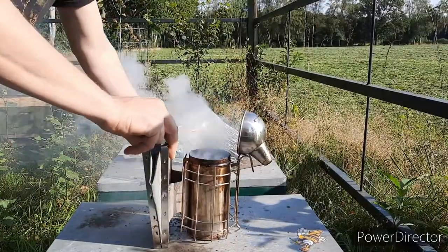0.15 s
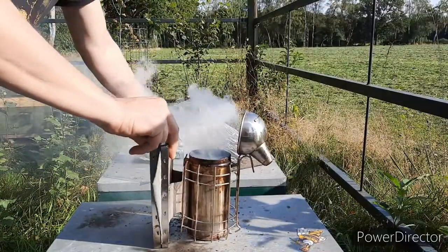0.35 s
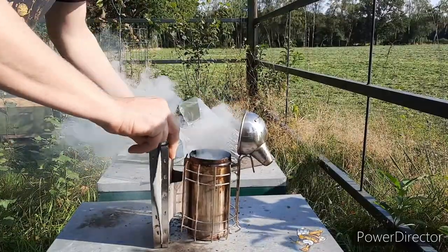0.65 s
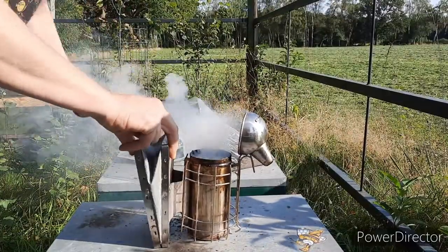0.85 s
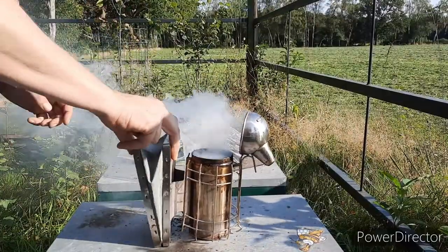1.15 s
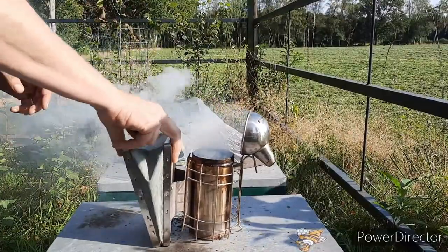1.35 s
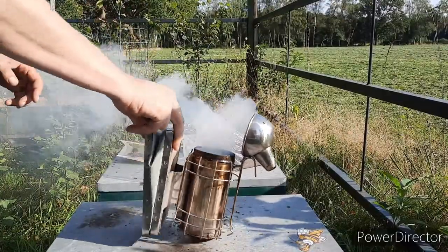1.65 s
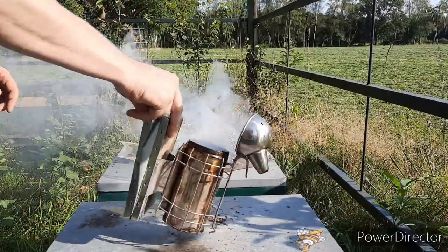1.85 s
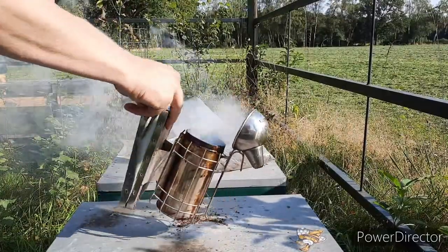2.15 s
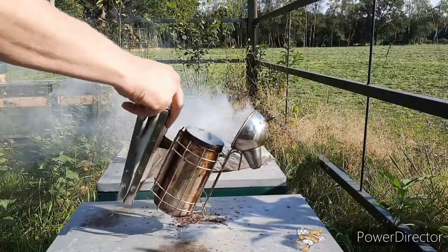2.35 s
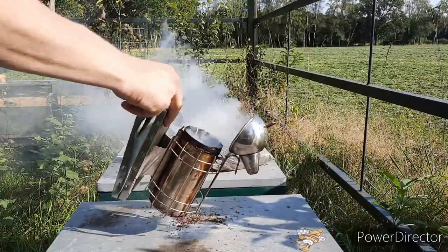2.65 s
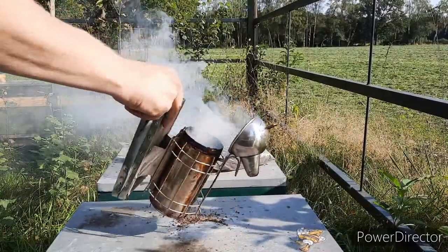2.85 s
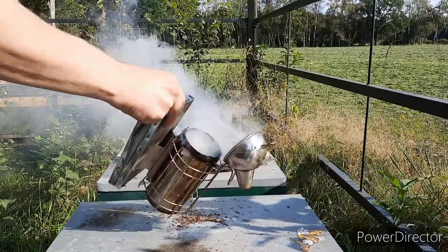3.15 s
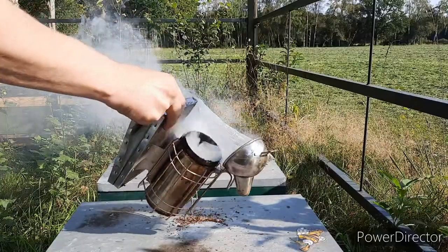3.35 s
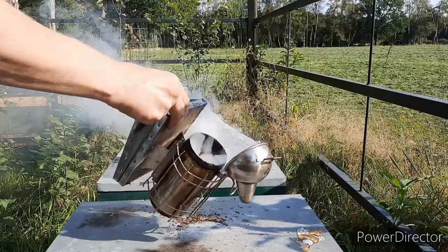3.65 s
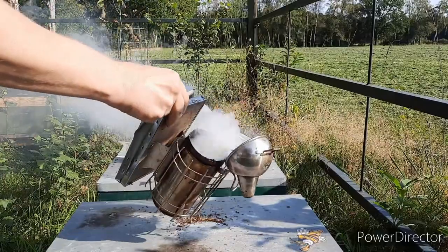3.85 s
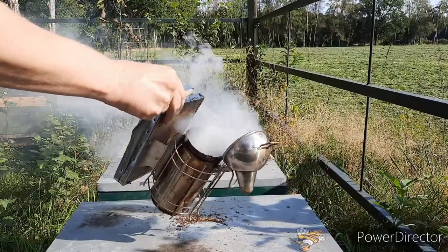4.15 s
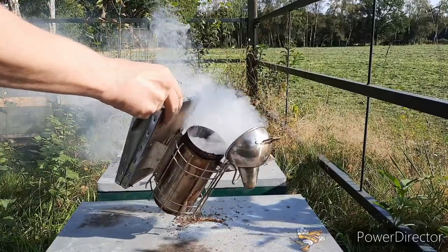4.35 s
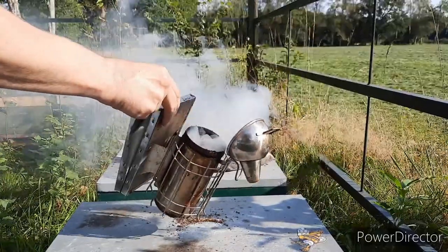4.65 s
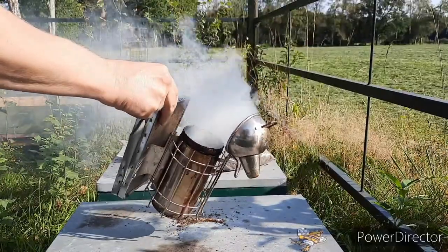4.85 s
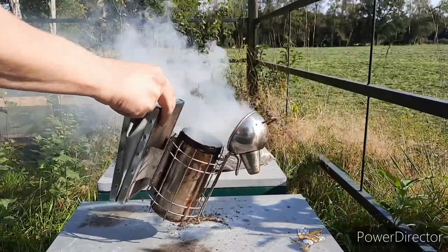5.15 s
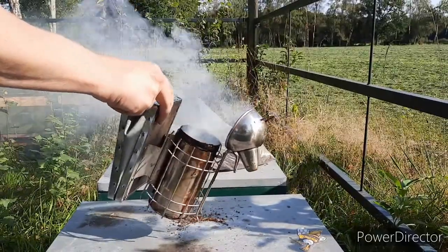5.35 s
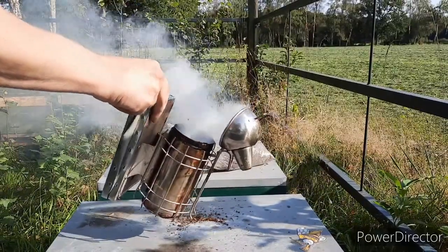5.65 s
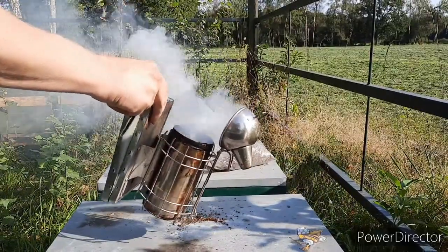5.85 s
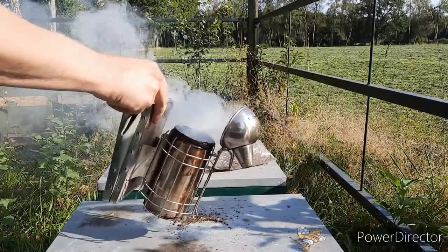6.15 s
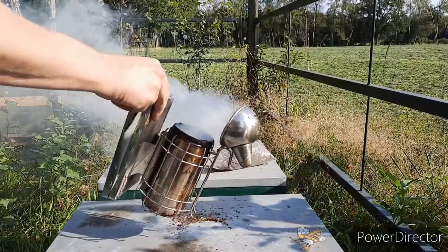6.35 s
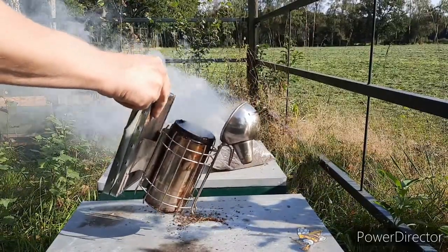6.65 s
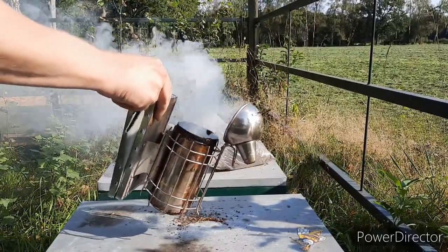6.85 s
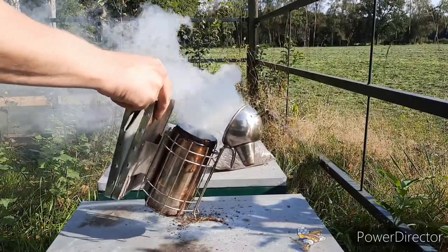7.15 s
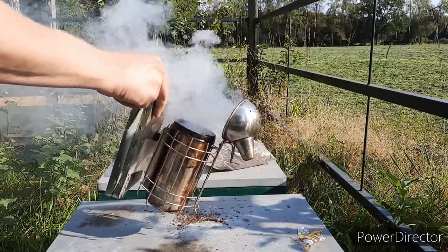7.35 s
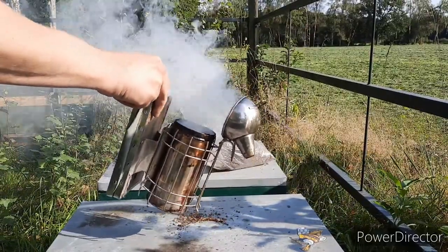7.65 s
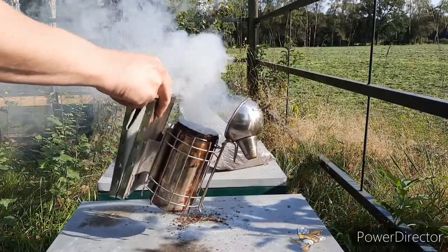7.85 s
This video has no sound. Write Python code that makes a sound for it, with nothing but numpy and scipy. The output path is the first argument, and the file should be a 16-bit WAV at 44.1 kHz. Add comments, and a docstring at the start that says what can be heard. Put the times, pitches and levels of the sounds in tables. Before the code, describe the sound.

Close puffs of air roar through a smouldering tin can, with leather rustle, ticks and knocks, low wind buffeting and later distant rooster calls.

```python
"""Hand bellows pump air into a tin can of smouldering fuel in a meadow, heard close by a two-port microphone.
From the start strokes roar in the can, hiss and whistle at the air hole, over a far hush and buffeting wind.
Between strokes leather rustles and the inlet wheezes; tin and boards tick and knock until about 6 s.
A second hand scrapes over the bellows in the first 1.3 s. From 3.7 s two roosters call far away; the
longest pause between strokes falls near 5 s. Sources are shaped noise, swept tones and ringing modes."""
import sys
import numpy as np
from scipy import signal
from scipy.fft import rfft, irfft, next_fast_len
from scipy.io import wavfile
from scipy.ndimage import uniform_filter1d, map_coordinates

SR = 44100
rng = np.random.default_rng(int(sys.argv[2]) if len(sys.argv) > 2 else 0)


def wav_record(signal):
    """Record a signal, one row per channel, as 16-bit PCM in the file named by sys.argv[1]."""
    frames = np.transpose(np.atleast_2d(signal))
    bounded = np.clip(frames, -1, 1)
    # unit amplitude maps onto the largest positive 16-bit level
    quanta = np.round(bounded * 32767).astype(np.int16)
    wavfile.write(sys.argv[1], SR, quanta)


N = 352800  # 8 s

# bellows strokes: (start [s], fastest [s], end [s], roar level [dB], top of the whistle [Hz],
# whistle level [dB], rustle level of the refill [dB])
BELLOWS_STROKES = [(-0.052, -0.01, 0.042, -25.3, 8300, -60, -54),
                   (0.233, 0.299, 0.372, -22.8, 8860, -56, -53), (0.562, 0.615, 0.7, -33.2, 7300, -70, -59),
                   (0.986, 1.036, 1.13, -27.4, 8020, -61, -55),
                   (1.462, 1.568, 1.709, -24.9, 8680, -55, -60),
                   (1.847, 1.913, 1.999, -27.6, 8320, -57, -59),
                   (2.173, 2.231, 2.339, -30.6, 8860, -57, -62),
                   (2.507, 2.565, 2.649, -28.5, 9280, -58, -59),
                   (2.833, 2.887, 2.96, -26.5, 9580, -58, -55),
                   (3.141, 3.187, 3.302, -29.5, 8800, -57, -59),
                   (3.462, 3.52, 3.598, -33.9, 7360, -68, -57),
                   (3.759, 3.821, 3.922, -30.5, 8500, -56, -56),
                   (4.099, 4.161, 4.246, -29.4, 8680, -54, -56),
                   (4.441, 4.495, 4.602, -30.9, 8200, -67, -57),
                   (4.772, 4.83, 4.893, -28.5, 10200, -63, -63),
                   (5.478, 5.564, 5.711, -30.3, 7900, -56, -59),
                   (5.895, 5.949, 6.054, -28.6, 8860, -58, -56), (6.246, 6.3, 6.376, -29.8, 8140, -62, -55),
                   (6.56, 6.63, 6.708, -28.9, 8980, -57, -59), (6.907, 6.961, 7.057, -28.9, 9460, -59, -59),
                   (7.258, 7.312, 7.388, -29.5, 8980, -58, -54),
                   (7.579, 7.653, 7.734, -30.0, 8320, -54, -58),
                   (7.924, 7.982, 8.07, -29.5, 8560, -53, -65)]
# modes of the air in the can: (centre [Hz], width [Hz], level [dB])
CAN_MODES = [(383, 234, -8.5), (564.2, 76.8, 4), (697, 350, -10), (1198, 168, -9.5), (1386, 260, -15.5),
             (2190, 400, -22)]
# modes of the tin wall: (centre [Hz], width [Hz], level [dB])
TIN_MODES = [(1400, 1870, 8), (5800, 1840, 4.5), (12500, 1500, 0)]
LEAD_S = .00012  # a near source reaches the left port this much earlier


def amp(db):
    """Gain of a level in dB."""
    return 10 ** (np.asarray(db) / 20)


def unit(x):
    """x at rms 1."""
    return x / np.sqrt(np.mean(x ** 2) + 1e-20)


def along(points, hz):
    """Value at hz of (frequency, value) points, on a log frequency axis."""
    f, v = np.transpose(points)
    return np.interp(np.log(hz + 1), np.log(f + 1), v)


def wobble(rate):
    """A smooth random curve, rate knots a second."""
    knots = rng.standard_normal(int(N * rate / SR) + 4)
    return map_coordinates(knots, [np.arange(N) * rate / SR])


def filtered(x, response):
    """x times a complex response of frequency."""
    m = next_fast_len(N + SR // 2)
    return irfft(rfft(x, m) * response(np.fft.rfftfreq(m, 1 / SR)), m)[..., :N]


def resonances(modes):
    """Causal response of (centre, width, level) modes, summed with alternating sign."""
    def response(f):
        return sum((-1) ** k * amp(db) * 1j * f * width / (centre * centre - f * f + 1j * f * width)
                   for k, (centre, width, db) in enumerate(modes))
    return response


def noise(spectrum, channels=1):
    """Coloured noise of rms 1."""
    return unit(filtered(rng.standard_normal((channels, N)), lambda hz: amp(along(spectrum, hz))))


def patchy(x, depth_db):
    """x in patches of random gain, some 500 Hz by 20 ms, at rms 1."""
    z = signal.stft(x, nperseg=256)[2]
    field = uniform_filter1d(rng.standard_normal(z.shape[-2:]), size=3, axis=0)
    field = uniform_filter1d(field, size=7, axis=1)
    return unit(signal.istft(z * amp(depth_db * unit(field)), nperseg=256)[1][..., :N])


def placed(x, lead_s=LEAD_S):
    """A near source reaches the left port first; the right port faces away and hears less treble."""
    # shading of the right port: (frequency [Hz], left minus right [dB])
    shade = [(100, 0), (350, 4), (700, 2.5), (2400, 3), (5000, 0), (7000, 1), (9000, 12), (11000, 10),
             (15000, 4)]
    half = np.array([[.5], [-.5]])  # each port takes half the difference
    return filtered(x, lambda hz: amp(along(shade, hz) * half) * np.exp(2j * np.pi * hz * lead_s * half))


def air_hiss(level):
    """Jet noise at the hole, partly direct, partly scattered off the table."""
    # spectrum of the jet: (frequency [Hz], density [dB per Hz])
    jet = [(1500, -31), (2600, -8.5), (4500, 1.5), (6600, -1), (8600, -11.5), (9400, -35), (11000, -7),
           (13000, -15), (15500, -8.5)]
    direct = noise(jet)[0]
    scattered = 1.6 * noise(jet, channels=2)
    return level * placed(1.04 * patchy(direct + scattered, depth_db=2.5))


def creases():
    """Clumped clicks of uneven size through the tin, rms 1."""
    struck = rng.random(N) < 900 * amp(4 * wobble(30)) / SR  # 900 a second before clumping
    size = amp(4 * rng.exponential(size=N).clip(0, 4))
    clicks = struck * size * rng.choice([-1, 1], N)
    return unit(filtered(clicks, resonances(TIN_MODES)))


def meadow():
    """The far hush, gently wavering, nearly alike on both ports in the bass."""
    # spectrum of the hush: (frequency [Hz], density [dB per Hz])
    hush = [(59, -28), (100, -3.5), (149, -11), (181, -2), (205, -14), (370, -6.5), (1800, -25.5),
            (3930, -34), (7560, -26), (10800, -34), (15500, -21.5)]
    # how alike the ports are: (frequency [Hz], left-right likeness [0 to 1])
    alike = [(100, 1), (290, 0.59), (640, 0), (1400, 0)]

    def shares(hz):
        turn = np.arccos(np.clip(along(alike, hz), -1, 1)) / 2
        return np.array([np.cos(turn), np.sin(turn)])

    mid, side = filtered(patchy(noise(hush, channels=2), depth_db=1.5), shares)
    return amp(-59.0 + 1.1 * wobble(2.93)) * np.array([mid + side, mid - side])


def wind():
    """Lumpy low buffeting, different on each port: a wavering breeze, and gusts that swell and sink."""
    # spectrum of the buffeting: (frequency [Hz], density [dB per Hz])
    rumble = [(20, -30), (65, 5), (89, -2.5), (161, -15.5), (239, -27.5), (300, -24), (390, -43),
              (660, -120)]
    # gusts on one port: (port, peak [s], length [s], level [dB])
    gusts = [("left", 0.27, 0.12, -56), ("left", 0.565, 0.17, -37.5), ("left", 0.663, 0.15, -44),
             ("left", 0.772, 0.16, -44), ("left", 1.21, 0.22, -45), ("left", 1.35, 0.1, -40.5),
             ("left", 1.45, 0.21, -34.5), ("left", 1.67, 0.21, -44), ("left", 1.966, 0.21, -47),
             ("left", 2.2, 0.15, -54), ("left", 3.4, 0.3, -54), ("left", 4.5, 0.19, -47),
             ("right", 0.072, 0.11, -45.5), ("right", 0.24, 0.24, -41.5), ("right", 0.4, 0.075, -43),
             ("right", 0.553, 0.31, -37.5), ("right", 0.716, 0.11, -35), ("right", 0.86, 0.34, -50.5),
             ("right", 1.094, 0.24, -34.5), ("right", 1.246, 0.11, -41.5), ("right", 1.436, 0.14, -40),
             ("right", 1.61, 0.25, -44), ("right", 2.55, 0.11, -53), ("right", 2.92, 0.14, -52),
             ("right", 3.88, 0.21, -50), ("right", 4.15, 0.37, -43.5), ("right", 4.4, 0.34, -59),
             ("right", 5.93, 0.34, -42.5)]
    breeze_db, swing_db = -67.5, 5.5
    t = np.arange(N) / SR
    level = amp(breeze_db + swing_db * np.array([wobble(2.89), wobble(6.7)]))
    for port, peak, length, db in gusts:
        swell = np.cos(np.pi * ((t - peak) / length).clip(-.5, .5)) ** 2
        level[int(port == "right")] += amp(db) * swell
    lumps = amp(2.5 * np.array([wobble(16), wobble(16)]))
    return level * unit(lumps * noise(rumble, channels=2))


def strokes():
    """The roar swells and fades evenly over each stroke; hiss and whistle follow the air speed, upper modes both."""
    # the top of the whistle tells the jet speed, which sets the hiss: (top [Hz], hiss level [dB])
    hiss_by_top = [(7300, -62), (7900, -55), (9000, -51.5), (10200, -50.5)]
    # the whistle catches near full speed and holds on longer as the jet slows (shares of full speed)
    catch, let_go = .78, .7
    pitch_power = 1.45  # pitch of the edge tone goes with this power of the speed
    # a harder stroke is brighter: extra dB in the upper modes per dB of roar over an ordinary stroke
    brightens, ordinary_db = .3, -29
    t = np.arange(N) / SR
    roar, bright, hiss, tone, pitch = np.zeros((5, N))
    for start, fastest, end, roar_db, top_hz, whistle_db, _ in BELLOWS_STROKES:
        speed = np.sin(np.pi * np.interp(t, [start, fastest, end], [0, .5, 1])).clip(0)
        # the fuel bed evens out the flow
        draught = np.sin(np.pi * np.interp(t, [start, end], [0, 1])).clip(0)
        roar += amp(roar_db) * draught ** 2.3 / (.5 + .5 * draught ** 1.15)
        # the upper modes need a faster jet
        bright_db = roar_db + brightens * (roar_db - ordinary_db)
        bright += amp(bright_db) * (draught * speed) ** 1.52
        # the jet breaks up suddenly, then the hiss sinks with the speed
        rising = t < fastest
        breakup = np.where(rising, ((speed - .55) / .35).clip(0, 1), speed ** 2.5)
        hiss += amp(along(hiss_by_top, top_hz)) * breakup
        threshold = np.where(rising, catch, let_go)
        tone += amp(whistle_db) * ((speed - threshold) / .15).clip(0, 1)
        pitch += top_hz * speed ** pitch_power

    flutter = amp(1.71 * wobble(60))  # eddies at the hole

    # the low modes wander, and sink as the can is tilted
    sway = np.pi / 4 * (1 + np.tanh(wobble(9) + (t - 3.5) / 3))
    detune = np.array([[.96], [1.07]])  # raised and lowered modes

    def low_response(f):
        return resonances(CAN_MODES[:2])(f * detune) * f ** 4 / (f ** 4 + 260 ** 4)

    def high_response(f):
        return resonances(CAN_MODES[2:])(f) / (1 + (f / 2800) ** 6)

    up, down = filtered(flutter * rng.standard_normal((2, N)), low_response)
    low = unit(np.cos(sway) * up + np.sin(sway) * down)
    high = patchy(filtered(flutter * rng.standard_normal((3, N)), high_response), depth_db=3)

    # the whistle breathes, and fades where its pitch passes 9.5 kHz
    breathy = amp(1 + 2 * wobble(40) + 3 * wobble(120)) * (1 + .4 * wobble(500) + .5 * wobble(2500))
    phase = 2 * np.pi * np.cumsum(pitch * (1 + .013 * wobble(120))) / SR
    whistle = tone * breathy * np.sin(phase) / (1 + (pitch / 9500) ** 20)

    # one part of the upper modes is shared by the ports, a weaker part differs between them
    upper = amp(-4.5) * bright * high[0] + amp(-14.0) * bright * high[1:]
    can = placed(roar * low, lead_s=0.00014) + placed(upper + whistle)
    return can + air_hiss(hiss * amp(1.6 * wobble(70) + 1.6 * wobble(300)))


def handling():
    """A second hand grips and shifts the bellows: clumped scraping on leather and tin, crackle on top."""
    # the grip, before the scrape and crackle gains: (time [s], level [dB])
    grip = [(0, -46), (0.2, -50.5), (0.42, -50.5), (0.5, -54.5), (0.68, -50.5), (0.76, -65), (1.1, -102),
            (1.18, -50.5), (1.3, -70.5), (1.6, -76)]
    # spectrum of the scraping: (frequency [Hz], density [dB per Hz])
    scrape_spectrum = [(600, -22), (1200, 4.5), (3000, -2.5), (7000, -7.5), (9400, -19.5), (12000, -12),
                       (15500, -19)]
    crackle_db, scrape_db = -1.5, 2.5
    clumps = amp(2.5 * wobble(35) + 3.5 * wobble(200))
    fingers = noise(scrape_spectrum)[0] + noise(scrape_spectrum, channels=2)
    scrape = patchy(clumps * fingers, depth_db=2)
    times, levels_db = np.transpose(grip)
    level = amp(np.interp(np.arange(N) / SR, times, levels_db))
    return placed(level * (amp(scrape_db) * scrape + amp(crackle_db) * creases()))


def refill():
    """The bellows spring open and suck air back: leather rustles in clumps and crackles, the inlet wheezes."""
    # spectrum of the leather: (frequency [Hz], density [dB per Hz])
    leather_spectrum = [(150, -12.5), (310, 5), (472, 5.5), (1340, -3.5), (3500, -26.5), (4550, -54),
                        (7700, -120)]
    # modes of the wheezing inlet: (centre [Hz], width [Hz], level [dB])
    inlet_modes = [(5730, 230, 4), (6580, 470, -0.5)]
    # the clearest wheezes: (time [s], level [dB])
    wheezes = [(2.11, -64), (3.72, -69)]
    suck_db = -12  # air sucked back, relative to the rustle
    wheeze_db, crackle_db = -5, -3  # relative to the sucked air
    t, rustle = np.arange(N) / SR, np.zeros(N)
    for _, fastest, end, *_, rustle_db in BELLOWS_STROKES:
        knots = [fastest, end + 0.0021, end + 0.076, end + 0.35]
        rustle += amp(rustle_db) * np.interp(t, knots, [0.013, 1.0, 0.88, 0.0005])
    air, clumps = amp(suck_db) * rustle, wobble(45)
    clumped = amp(2.15 * clumps + 0.14 * wobble(170)) * noise(leather_spectrum)[0]
    leather = 0.93 * rustle * unit(clumped)
    crackle = amp(crackle_db) * air * creases()
    inlet = unit(filtered(rng.standard_normal(N), resonances(inlet_modes)))
    fits = amp(wheeze_db) * air * unit(amp(6 * wobble(30)))
    for s, db in wheezes:
        fits += amp(db) * np.exp(-((t - s) / .02) ** 2)
    return placed(leather + crackle + fits * inlet) + air_hiss(air * amp(2.5 * clumps + 1.5 * wobble(180)))


def contacts():
    """A tick is a short crack through the tin, a knock a soft push on the air in the can."""
    # contacts of boards, hinge and tin: (time [s], tick level [dB], knock level before a 9.5 dB lift [dB])
    touches = [(0.0876, -28.5, -75), (0.168, -37, -35), (0.364, -33.5, -61), (0.4402, -29, -36),
               (0.467, -22.5, -35.5), (0.5576, -40.5, -29.5), (0.583, -38, -43), (0.6803, -30, -48),
               (0.695, -32, -42), (1.1567, -36.5, -43), (1.272, -50, -70), (1.3923, -34, -47),
               (1.413, -50, -60), (2.7094, -50, -44), (2.735, -54, -41.5), (2.999, -44, -42),
               (3.0237, -55, -32), (3.362, -69, -39), (3.6596, -87.5, -37), (3.8882, -41, -41),
               (3.989, -67, -40), (4.3588, -56, -43), (4.6884, -55, -44), (4.8614, -70, -26),
               (6.069, -43.5, -46)]
    t = np.arange(600) / SR
    cracks, pushes = np.zeros((2, N + 600))
    for s, tick_db, knock_db in touches:
        place = slice(round(s * SR), round(s * SR) + len(t))
        cracks[place] += amp(tick_db - 60 * t / .015) * rng.standard_normal(len(t))  # 60 dB down in 15 ms
        pushes[place] += amp(knock_db + 9.5) * np.sin(np.pi * (t / 0.0015).clip(0, 1))
    ticks = filtered(cracks[:N], resonances(TIN_MODES))
    knocks = filtered(pushes[:N], resonances(CAN_MODES))
    return placed(ticks + knocks)


def rooster():
    """Hoarse sagging partials through the throat, tone and rasp, smeared by the echoes of a long path."""
    # notes of two roosters, level before the throat:
    # (start [s], end [s], pitch [Hz], level [dB], brightness [dB per octave])
    crows = [(3.662, 3.8, 428, -58, 5), (3.942, 4.132, 535, -65, 8), (3.98, 4.12, 390, -61, -4),
             (4.243, 4.453, 380, -63, -2), (5.41, 5.82, 728, -49, -25), (5.42, 5.57, 432, -61, 7),
             (5.991, 6.233, 590, -55, -5), (6.396, 6.716, 577, -55, 0), (6.85, 6.96, 623, -56, -8),
             (6.972, 7.275, 563, -57, -24), (7.36, 7.616, 552, -54, -12), (7.383, 7.56, 440, -65, 7),
             (7.62, 7.905, 556, -60, -24)]
    # colour of the throat: (frequency [Hz], gain [dB])
    throat = [(400, -25), (800, 0), (1150, 2), (1300, -13), (1700, -3), (2000, -8), (2350, -7), (2900, -25)]
    voice, waver = np.zeros(N), wobble(40)
    # partials 2 to 4, each with its own rasp
    rasp = {k: 1 + .3 * wobble(50) + .6 * wobble(160) + .7 * wobble(500) for k in range(2, 5)}
    for start, end, pitch_hz, db, bright_db in crows:
        note = slice(round(start * SR), round(end * SR))
        t = np.arange(note.stop - note.start) / SR
        gate = np.interp(t, [0, 0.05, t[-1] - .04, t[-1]], [0, 0.9, 0.7, 0])
        phase = 2 * np.pi * np.cumsum(pitch_hz * (1 - .08 * t + .016 * waver[note])) / SR
        for k in rasp:
            partial = amp(db + along(throat, k * pitch_hz) + bright_db * np.log2(k / 2))
            voice[note] += gate * partial * rasp[k][note] * np.sin(k * phase)
    fade = amp(-60 * np.arange(SR // 4) / SR / 0.17)  # 60 dB down in 0.17 s
    echoes = unit(rng.standard_normal((2, SR // 4)) * fade) / np.sqrt(SR // 2)
    direct = np.array([voice, np.roll(voice, 12)])  # 12 samples later at the right port
    return direct + signal.fftconvolve(voice[None], echoes, axes=1)[:, :N]


def scene():
    """All sources at the two ports."""
    return meadow() + wind() + strokes() + handling() + refill() + contacts() + rooster()


def record(dry):
    """The camera keeps only what lies below its band limit."""
    top_hz = 15520
    return filtered(dry, lambda hz: hz < top_hz)


dry = scene()
out = record(dry)
wav_record(out)
```